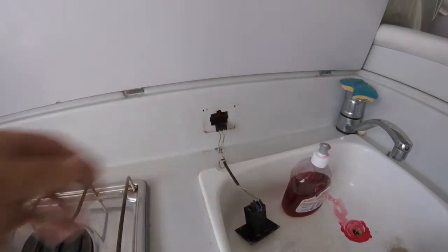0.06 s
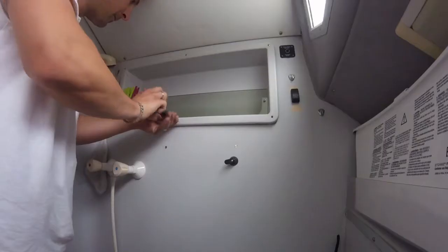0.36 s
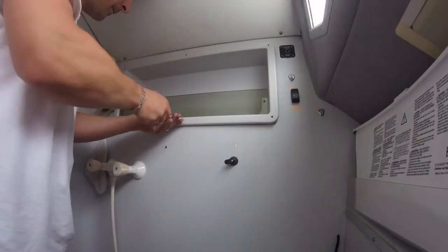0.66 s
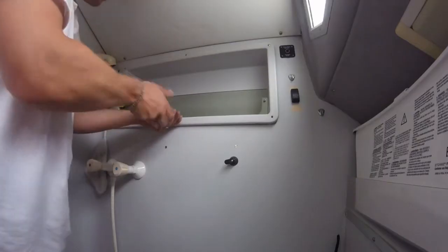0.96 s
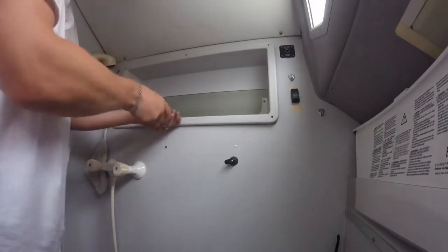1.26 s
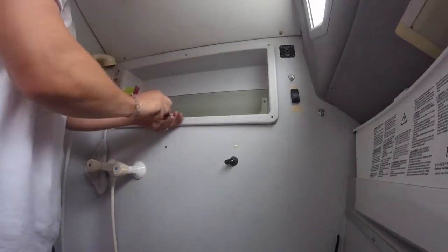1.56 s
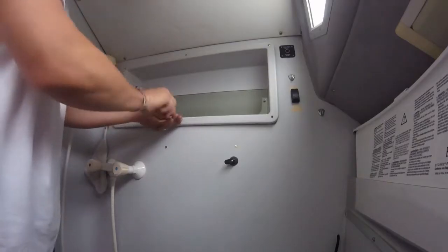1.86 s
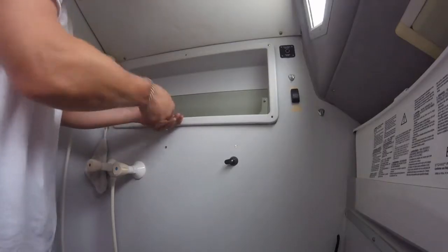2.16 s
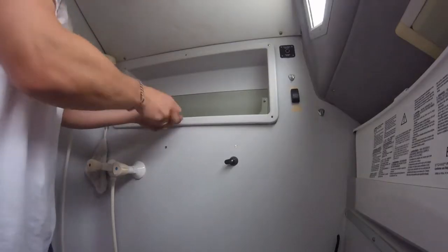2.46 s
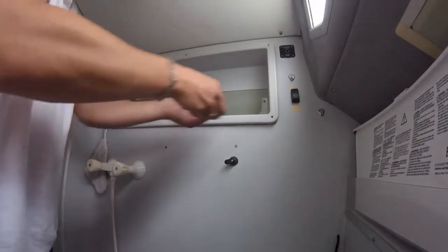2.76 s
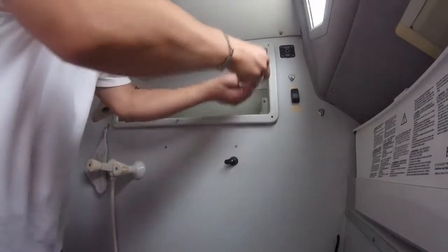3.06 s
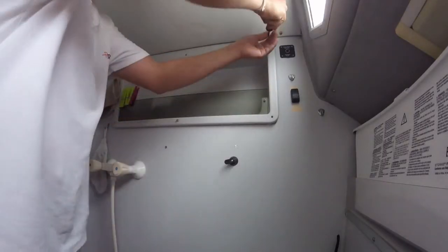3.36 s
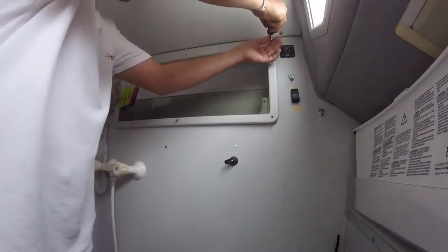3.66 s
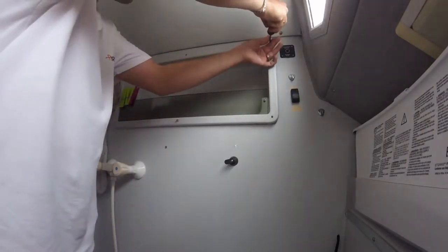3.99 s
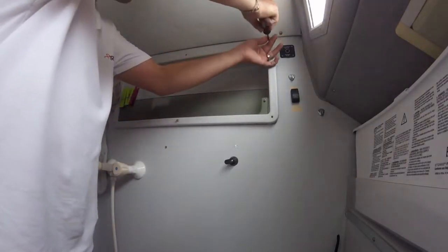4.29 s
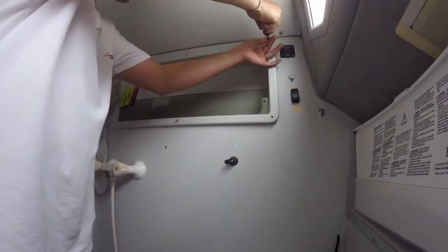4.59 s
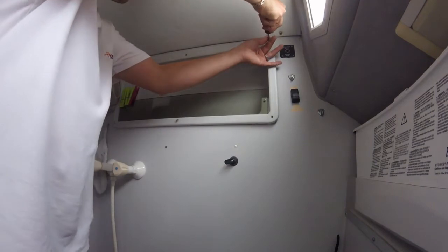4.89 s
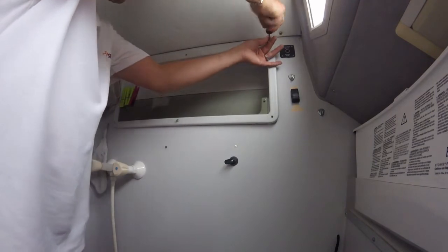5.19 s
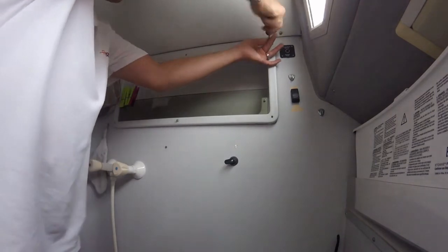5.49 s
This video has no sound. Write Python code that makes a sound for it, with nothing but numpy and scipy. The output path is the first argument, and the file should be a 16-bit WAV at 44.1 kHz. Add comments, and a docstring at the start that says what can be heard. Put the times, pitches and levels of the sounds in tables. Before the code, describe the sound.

After a moment of silence, the sound cuts in at about 0.3 seconds with a small boat cabin's low rumble, faint hum and soft air noise, and a brief high squeak. Until 2.6 seconds, a hand screwdriver backs screws out of a plastic frame: light, irregular knocks on a hollow wall, each with a small steel tick. Beneath them, the threads rasp softly with each twist and a chain bracelet jingles very faintly. The knocks crowd together after 2 seconds, then pause for about a second. From 3.6 seconds the work resumes with deeper, heavier thumps among lighter ticks, the strongest near 3.6, 4.5 and especially 5.1 seconds, with tiny squeaks and soft grinding from a tight screw. Around 5.3 to 5.6 seconds, the screw catches five times in a quick, even run, each heavier and duller. Close walls slightly blur every contact.

```python
"""A small boat cabin: a hand screwdriver backs screws out of a plastic access frame, first on the
lower rail, then at the top corner. Each turn knocks the frame and the hollow wall behind it, and the
steel tip ticks. The threads slip, rasp and squeak in the plastic; a chain bracelet jingles faintly.
Close walls blur every contact, over a low rumble, a faint hum and soft air noise."""
import sys
import numpy as np
from scipy import signal
from scipy.fft import rfft, irfft, next_fast_len
from scipy.io import wavfile
from scipy.ndimage import uniform_filter1d

SR = 44100
rng = np.random.default_rng(int(sys.argv[2]) if len(sys.argv) > 2 else 0)


def transcribe(u):
    """Save the signal u as a 16-bit wav file named by the first command-line argument.

    u: samples, shape (n,) or (channels, n), limited to [-1, 1]; the rate is SR.
    q: integer samples, one column per channel.
    """
    v = np.clip(np.atleast_2d(u).T, -1, 1)
    q = np.round(v * 32767).astype(np.int16)
    wavfile.write(sys.argv[1], SR, q)


N = 248724
TIME = np.arange(N) / SR
RING_N = SR * 3 // 10
RING_TIME = np.arange(RING_N) / SR
MOVE_S = 3.0  # hands go from rail to corner
CONTACT_S, LEAD_S = 0.0069, 0.0056
FULL_DB = -19  # panel level of a full-strength knock


# Screwdriver knocks. Each row: time in seconds, panel level in dB, frame ring and tip tick in dB re panel.
KNOCK_HITS = [(.415, -37.5, -2, -19), (.512, -36, -6, -16), (.662, -35.5, -6, -18.5), (.821, -44, -11, -18),
              (.88, -46.5, -2, -24), (1.135, -42, -6.5, -11), (1.293, -32, -2, -17),
              (1.398, -46.5, -19, -24), (1.476, -33, -8.5, -13.5), (1.554, -44.5, -11, -12.5),
              (1.674, -35, 2.5, -13.5), (1.856, -40, -9.5, -13), (2.036, -37.5, -3, -23),
              (2.064, -37.5, -5, -19), (2.208, -34, -11, -17.5), (2.276, -30.5, -10, -21),
              (2.413, -29.5, -9, -23.5), (2.459, -39.5, -4, -22), (2.489, -29.5, -3, -25.5),
              (2.539, -30, -7.5, -21), (2.6, -39, -11, -16), (3.562, -32, -7.5, -11),
              (3.594, -20, 1.5, -41), (3.714, -37, -17, -27), (4.015, -39.5, -5, -33),
              (4.034, -27.5, -14, -28.5), (4.328, -46, 10, -24), (4.36, -53, 10.5, -28),
              (4.472, -20.5, -2.5, -11.5), (4.564, -31.5, -16, -15), (4.734, -35.5, 1, -17.5),
              (4.766, -37.5, -1.5, -6.5), (4.83, -31.5, -1.5, -31), (5.109, -17.5, -14.5, -15)]
def knocks():
    """Each knock sits in a short scrape of the tip, which grows a little with its strength."""
    out = np.zeros(N)
    for at_s, db, ring_db, tick_db in KNOCK_HITS:
        add(out, at_s - LEAD_S, knock(at_s, db, ring_db, tick_db))
        grind_db = -42 + 0.21 * (db - FULL_DB)
        add(out, at_s - 0.026, grind(at_s, length_s=0.077, wall_db=grind_db, rasp_db=grind_db - 24))
    return out


def knock(at_s, db, ring_db, tick_db, softening=0.81):
    """A soft push moves the whole wall; a hard slip rings the frame and ticks at the tip."""
    wall = lowpass(wall_ring(at_s, t60_s=0.14, rise_s=CONTACT_S), 2320, order=4)
    full_thump_db, thump_growth = (-39.5, 0.042) if at_s < MOVE_S else (-24, 1.14)
    thump = undb(full_thump_db + thump_growth * (db - FULL_DB)) * crest(band(wall, 52, 176))
    # softer contact: duller panel, duller tick
    panel_top_hz = 1400 * undb(softening * ring_db)
    tick_top_hz = 6500 * undb(softening * (tick_db + 13))
    panel = crest(lowpass(band(wall, 197, 630), panel_top_hz, order=2), size=512)
    frame = undb(ring_db) * crest(band(wall, 583, 2500))
    shaft_db = -2 + 0.35 * (db + ring_db - FULL_DB)
    tip = undb(tick_db) * tip_tick(tick_top_hz, shaft_db)
    return thump + undb(db) * (panel + frame + tip)


# Wall modes at the lower rail. Each row: frequency in Hz, level in dB, t60 in seconds.
WALL_RAIL_MODES = [(107, 8, 0.039), (242, -11.5, 0.12), (280, -2, 0.1), (329.5, 2, 0.062), (377, -8, 0.1),
                   (441.8, 1, 0.09), (565, -10.5, 0.084), (646.5, -13, 0.075), (761, -5.5, 0.055),
                   (844.4, -11.5, 0.11), (918, -3, 0.039), (1034, -12, 0.082), (1210, -21.5, 0.089),
                   (1494, -21, 0.054)]
# Wall modes at the top corner. Each row: frequency in Hz, level in dB, t60 in seconds.
WALL_CORNER_MODES = [(85.6, -2.5, 0.18), (104.8, -2, 0.11), (238.2, -4, 0.069), (266.3, -2.5, 0.072),
                     (313.4, -2, 0.13), (411.8, -6, 0.09), (461.4, -11, 0.13), (558.3, -16.5, 0.13),
                     (603, -11.5, 0.078), (834.4, -10.5, 0.096), (890.4, -3, 0.087), (932.3, -3, .12),
                     (1008, -19, 0.054)]
# Spectrum of the dense lesser wall modes. Each row: frequency in Hz, level in dB.
WALL_SPECTRUM = [(50, 18), (100, 1), (165, 5.5), (300, 1), (500, -2), (700, -9.5), (900, 2), (1080, -11),
                 (1300, -18.5), (1600, -38.5), (2200, -22), (3000, -27), (4500, -66)]
def wall_ring(at_s, t60_s, rise_s):
    """One blow on the wall where the hands are: main modes over a bed of dense ones."""
    modes = WALL_RAIL_MODES if at_s < MOVE_S else WALL_CORNER_MODES
    main = modal(modes, rise_s, detune=0.017)
    dense = crest(noise(WALL_SPECTRUM) * fade(t60_s, rise_s))
    return main + undb(-1) * dense


# Spectrum of a tip tick or thread slip. Each row: frequency in Hz, level in dB.
TICK_SPECTRUM = [(600, 3.5), (1300, -4.5), (2000, -6.5), (2800, -2.5), (3600, -3.5), (4600, -7.5),
                 (6800, -7), (8500, -14.5), (11000, -21), (15000, -34)]
# Steel shaft modes. Each row: frequency in Hz, level in dB, t60 in seconds.
STEEL_MODES = [(1425, -3, 0.13), (1556, 3, 0.091), (1720, -5, 0.17), (2470, -5, 0.12), (3570, 11, 0.041),
               (3715, 5.5, 0.066)]
def tip_tick(top_hz, shaft_db, t60_s=0.15, rise_s=0.87 * CONTACT_S):
    """The steel tip cracks and rings the shaft; the cabin holds a duller tail."""
    crack = unit(lowpass(noise(TICK_SPECTRUM), top_hz, order=1))
    dull_crack = signal.filtfilt(*signal.butter(2, 7000, fs=SR), crack)
    tail = undb(-28) * dull_crack * fade(t60_s=0.17, rise_s=0.015)
    shaft = undb(shaft_db) * modal(STEEL_MODES, rise_s, detune=0.0056)
    return crest(crest(crack * fade(t60_s, rise_s) + tail) + shaft)


def catches(start_s=5.269, period_s=0.0724):
    """The loosening corner screw catches in a quick, even run, each catch heavier and duller."""
    out = np.zeros(N)
    for k in range(5):
        at_s = start_s + k * period_s
        add(out, at_s - LEAD_S, knock(at_s, db=-41 + 1.53 * k, ring_db=1, tick_db=-8.5 - 4 * k))
    return out


# Stiff strokes. Each row: start in seconds, length in seconds, wall grind level in dB.
STIFF_TURNS = [(0.326, 0.09, -40), (4.309, .2, -50), (4.52, .12, -43.5), (4.641, 0.16, -44),
               (5.253, 0.23, -46), (5.503, 0.2, -45.5)]
def stiff_turns():
    """A tight screw grinds through each stroke."""
    out = np.zeros(N)
    for at_s, length_s, db in STIFF_TURNS:
        add(out, at_s, grind(at_s, length_s, wall_db=db, rasp_db=db - 21.5))
    return out


def rail_twists(start_s=0.74, period_s=0.368, whistle_hz=6750):
    """Even wrist twists: the regrip shakes the bracelet, then the thread grinds and whistles thinly."""
    out = np.zeros(N)
    for at_s in start_s + period_s * np.arange(5):
        add(out, at_s - 0.084, bracelet())
        add(out, at_s, grind(at_s, length_s=0.21, wall_db=-50, rasp_db=-64.5))
        add(out, at_s + 0.036, squeak(0.051, whistle_hz, whistle_hz, db=-67.5, roughness=0.06))
    return out


def grind(at_s, length_s, wall_db, rasp_db, slips_per_s=300, spread_db=3):
    """Tiny uneven slips shake the wall and rasp in the plastic."""
    slips = (rng.random(RING_N) < slips_per_s / SR) * rng.choice([-1, 1], RING_N)
    slips = slips * undb(spread_db * rng.standard_normal(RING_N))
    wall = band(signal.fftconvolve(slips, wall_ring(at_s, t60_s=0.087, rise_s=0.0053)), 167, 2400)
    rasp = signal.fftconvolve(slips, noise(TICK_SPECTRUM) * fade(t60_s=0.055, rise_s=0.00047))
    count = int(np.clip(length_s * SR, 1024, RING_N))
    stroke = undb(wall_db) * unit(wall[:count]) + undb(rasp_db) * unit(rasp[:count])
    return stroke * signal.windows.tukey(count, 0.6)


# Thread and tip squeaks. Each row: start in seconds, length in seconds, start pitch in Hz,
# end pitch in Hz, level in dB, roughness as a share of pitch.
SQUEAK_GLIDES = [(0.361, 0.0086, 7780, 7320, -28.5, 0.025), (0.365, 0.013, 7320, 4800, -28.5, 0.017),
                 (0.37, 0.025, 7530, 6400, -28.5, 0.021), (0.835, 0.013, 10450, 10320, -53, 0.0064),
                 (2.022, 0.045, 3450, 3520, -59, 0.044), (2.213, 0.013, 1730, 1610, -52, 0.041),
                 (2.484, 0.007, 4600, 3570, -53, 0.087), (3.565, 0.008, 5260, 3200, -48, 0.22),
                 (3.871, 0.017, 6930, 4900, -60, 0.15), (3.889, 0.022, 5010, 2670, -52, 0.26),
                 (4.009, 0.0081, 707, 674, -42, .033), (4.021, 0.017, 3540, 3060, -56.5, 0.078),
                 (4.041, 0.036, 635, 472, -41, 0.13), (5.29, .039, 5820, 5680, -61, 0.054),
                 (5.612, 0.022, 3330, 3620, -54.5, 0.049)]
def squeaks():
    """Now and then the thread or the tip squeaks."""
    out = np.zeros(N)
    for at_s, *glide in SQUEAK_GLIDES:
        add(out, at_s, squeak(*glide))
    return out


def squeak(length_s, start_hz, end_hz, db, roughness):
    """Fast stick-slip sings a gliding note, which the cabin smears into a short hiss."""
    jitter, reflections = rng.standard_normal((2, RING_N))
    count = max(int(length_s * SR), 64)
    jitter = unit(uniform_filter1d(jitter, size=40))[:count]
    hz = np.geomspace(start_hz, end_hz, count) * (1 + roughness * jitter)
    phase = 2 * np.pi * np.cumsum(hz) / SR
    note = (np.sin(phase) + undb(-30) * np.sin(2 * phase)) * signal.windows.tukey(count, 0.5)
    cabin = reflections * fade(t60_s=0.11, rise_s=0.00077)
    cabin /= np.linalg.norm(cabin)
    cabin[0] += undb(-9)  # direct path
    return undb(db) * crest(signal.fftconvolve(note, cabin))


# Spectrum of a chain link click. Each row: frequency in Hz, level in dB.
LINK_SPECTRUM = [(3000, -30), (6500, 5), (9500, -9), (13000, 0), (15000, -16)]
def bracelet(length_s=0.09, clicks_per_s=90, db=-71):
    """The links of a chain bracelet click together in a little shower."""
    clicks = (rng.random(RING_N) < clicks_per_s / SR) * rng.standard_normal(RING_N)
    clicks *= RING_TIME < length_s
    clicks[0] = 1.0
    link = noise(LINK_SPECTRUM) * fade(t60_s=0.055, rise_s=0.0024)
    return undb(db) * crest(signal.fftconvolve(clicks, link), size=1024)


# Rumble spectrum. Each row: frequency in Hz, level in dB.
RUMBLE_SPECTRUM = [(3, -24), (8, -1.5), (19, -15.5), (30, 0), (35, -3), (41, 5.5), (49, -4), (58, -6),
                   (68, -13.5), (82, -12), (105, -14), (140, -27.5), (250, -39), (1500, -110)]
# Rumble swell. Each row: time in seconds, level in dB.
RUMBLE_SWELL = [(.35, -35), (1.2, -39), (2.15, -34), (2.7, -37.5), (3.4, -38.5), (4.25, -36.5),
                (4.55, -32.5), (5.0, -35), (5.17, -30.5), (5.42, -39.5), (5.6, -30)]
def rumble():
    """A deep rumble fills the cabin, even in strength apart from its slow swell."""
    deep = noise(RUMBLE_SPECTRUM, N)
    deep /= np.sqrt(uniform_filter1d(deep ** 2, size=20000))
    return deep * undb(np.interp(TIME, *np.transpose(RUMBLE_SWELL)))


def hum(centre_hz=39.9, db=-45):
    """A low tone wavers in pitch."""
    hz = centre_hz * (1 + 0.04245 * drift(rate_hz=1.6))
    return undb(db) * unit(np.sin(2 * np.pi * np.cumsum(hz) / SR))


# Spectrum of still cabin air. Each row: frequency in Hz, level in dB.
AIR_SPECTRUM = [(140, -5), (190, -6.5), (320, -11), (420, -12.5), (520, -17.5), (770, -16.5), (900, -13),
                (1100, -23), (2000, -27.5), (4000, -31.5), (7000, -39.5), (10000, -43.5), (12300, -48),
                (14500, -81)]
def cabin_air(db=-54.5, flicker_db=0.5):
    """Soft air noise flickers slightly in level."""
    air = unit(band(noise(AIR_SPECTRUM, N), 87, 14000))
    return air * undb(db - flicker_db * drift(rate_hz=7.7))


def modal(modes, rise_s, detune, scatter_db=2):
    """Fading modes, a little different at each spot that is struck."""
    out = np.zeros(RING_N)
    for hz, db, t60_s in modes:
        level_draw, pitch_draw, phase_draw = rng.standard_normal(3)
        cycles = hz * (1 + detune * pitch_draw) * RING_TIME + phase_draw
        out += undb(db + scatter_db * level_draw) * fade(t60_s, rise_s) * np.sin(2 * np.pi * cycles)
    return crest(out)


def fade(t60_s, rise_s):
    """Reflections from the close walls pile up briefly, then die away."""
    return (1 - np.exp(-(RING_TIME / rise_s) ** 2)) * np.exp(-np.log(1000) * RING_TIME / t60_s)


def noise(spectrum, size=RING_N):
    """Noise with a (Hz, dB) spectrum; rms 1."""
    hz, db = np.transpose(spectrum)
    fft_size = next_fast_len(size)
    bin_hz = np.maximum(np.fft.rfftfreq(fft_size, 1 / SR), 1)
    gain = undb(np.interp(np.log(bin_hz), np.log(hz), db))
    return unit(irfft(rfft(rng.standard_normal(size), fft_size) * gain, fft_size)[:size])


def drift(rate_hz):
    """Slow random drift with a spread near 1."""
    hold = int(SR / rate_hz)
    steps = rng.standard_normal(512)[np.arange(N) // hold % 512]
    return 1.284 * uniform_filter1d(uniform_filter1d(steps, hold), hold)


def band(x, lo_hz, hi_hz):
    """Causal band-pass."""
    return signal.sosfilt(signal.butter(3, [lo_hz, hi_hz], "bandpass", fs=SR, output="sos"), x)


def lowpass(x, top_hz, order):
    """Causal low-pass."""
    return signal.sosfilt(signal.butter(order, min(top_hz, SR * 4 / 9), fs=SR, output="sos"), x)


def undb(db):
    """Decibels to gain."""
    return 10 ** (np.asarray(db) / 20)


def unit(x):
    """Scale to rms 1."""
    return x / np.sqrt(np.mean(x ** 2) + 1e-30)


def crest(x, size=256):
    """Scale the loudest stretch of `size` samples to rms 1."""
    return x / np.sqrt(uniform_filter1d(x ** 2, size).max())


def add(out, at_s, sound):
    """Mix a sound in at a time."""
    start = max(int(at_s * SR), 0)
    part = sound[:max(N - start, 0)]
    out[start:start + len(part)] += part


def scene():
    """Screwdriver work over the cabin background, in mono."""
    background = cabin_air() + rumble() + hum()
    return (background + knocks() + rail_twists() + stiff_turns() + catches() + squeaks())[None]


def record(dry, start_s=0.343, top_hz=14900):
    """The sound cuts in after a moment of silence; the highest treble is cut off."""
    gate = np.clip((TIME - start_s) * SR / 128, 0, 1)
    return signal.sosfilt(signal.ellip(8, 0.2, 70, top_hz, fs=SR, output="sos"), dry * gate)


dry = scene()
out = record(dry)
transcribe(out)
```